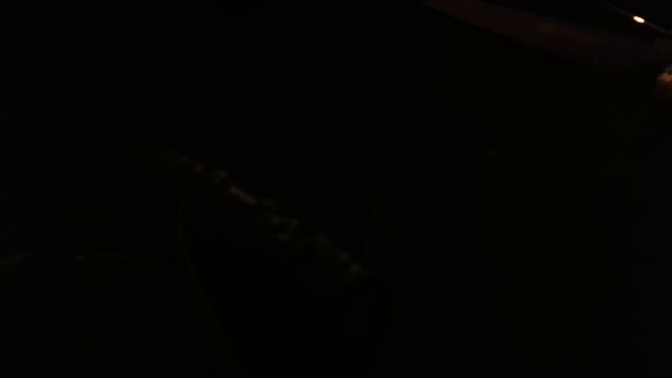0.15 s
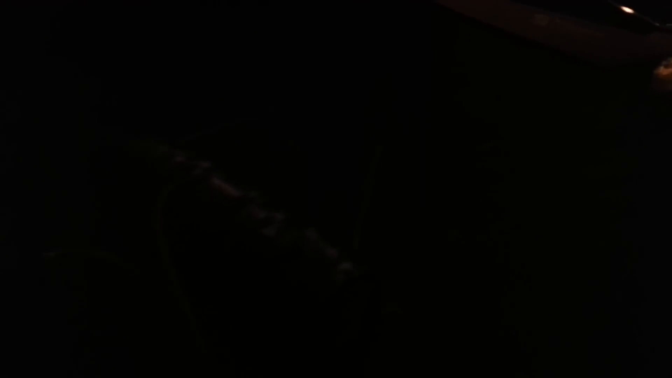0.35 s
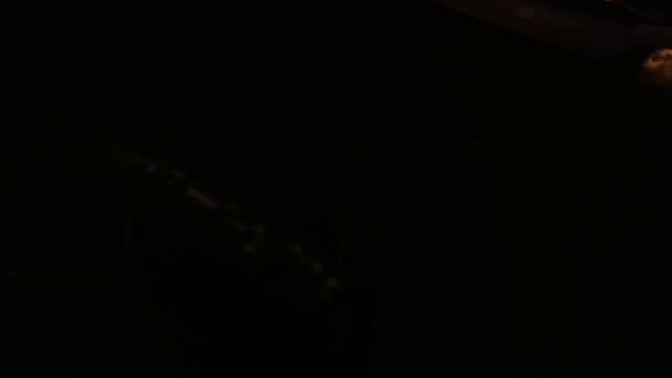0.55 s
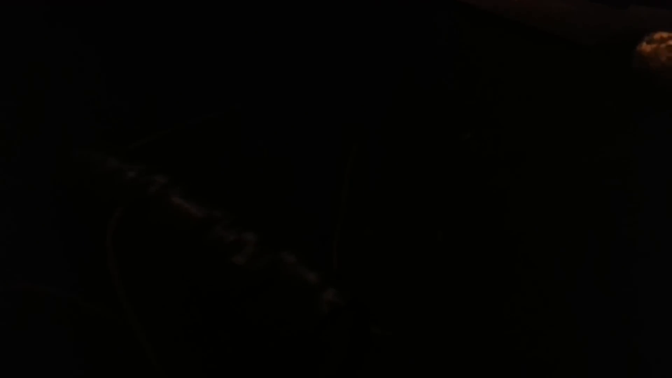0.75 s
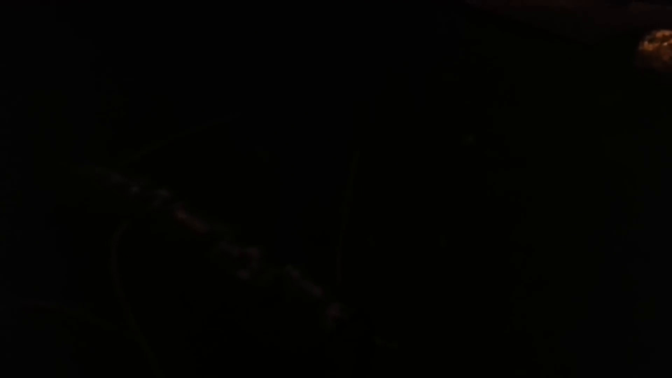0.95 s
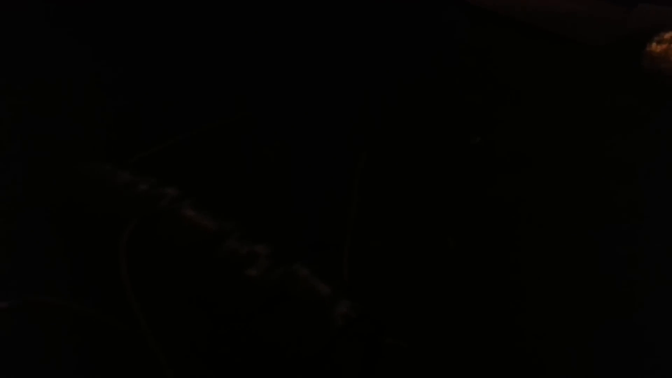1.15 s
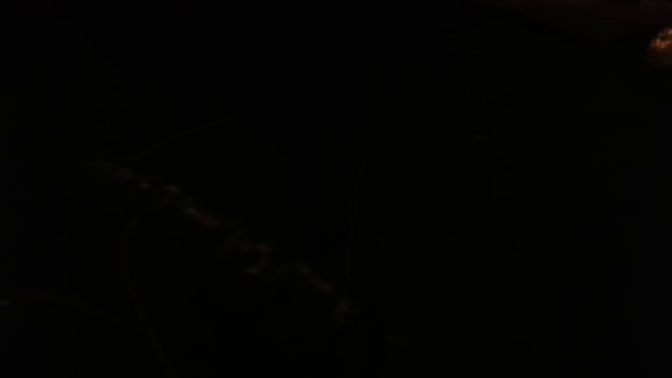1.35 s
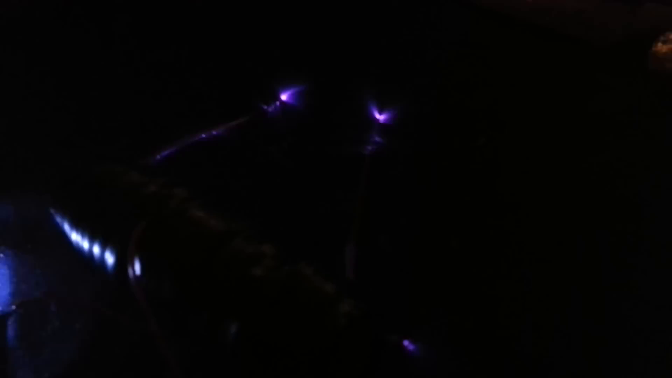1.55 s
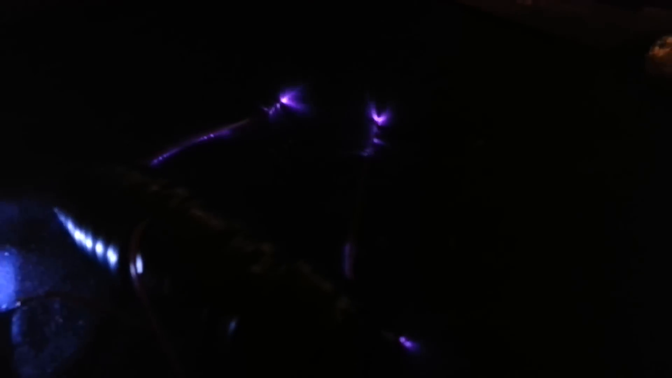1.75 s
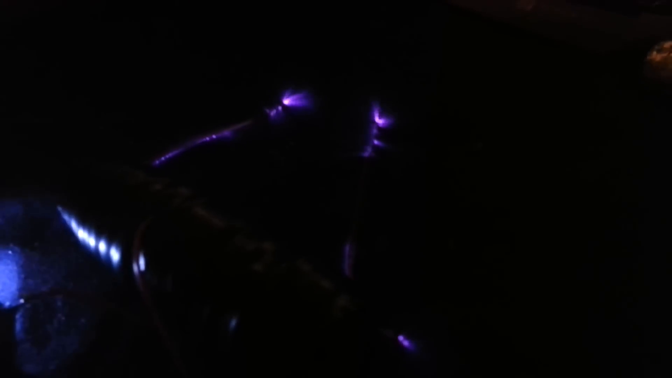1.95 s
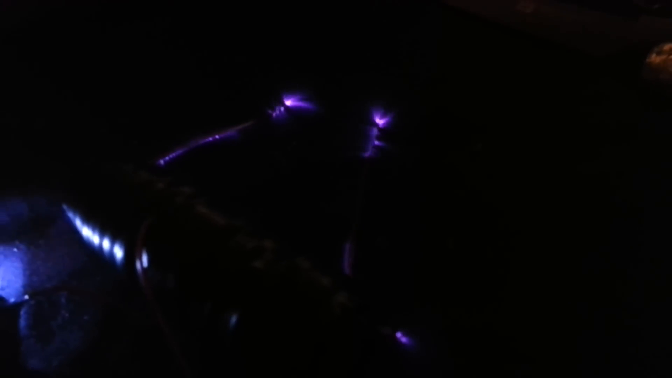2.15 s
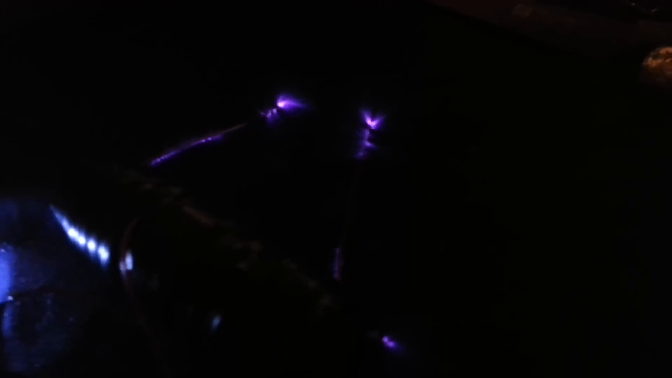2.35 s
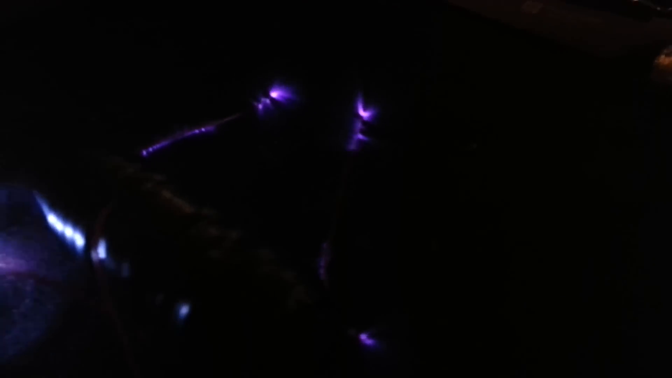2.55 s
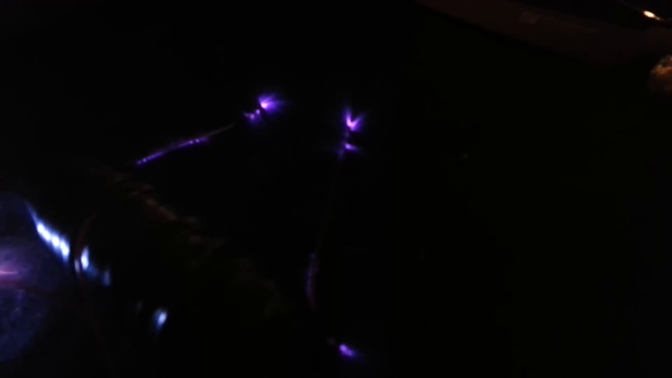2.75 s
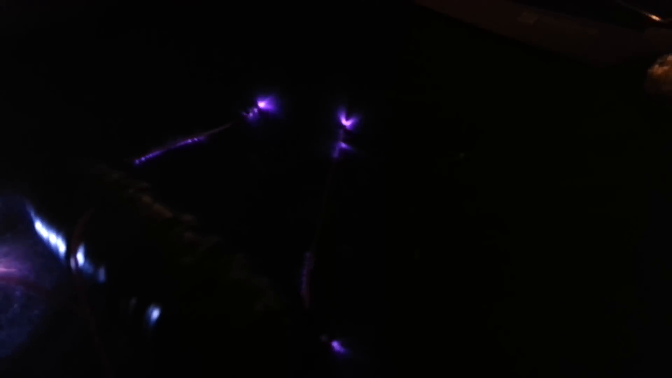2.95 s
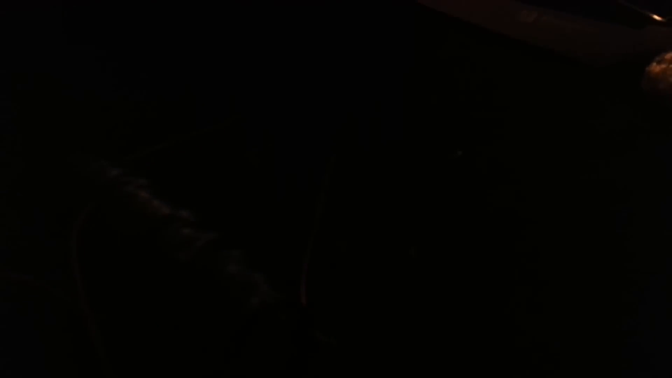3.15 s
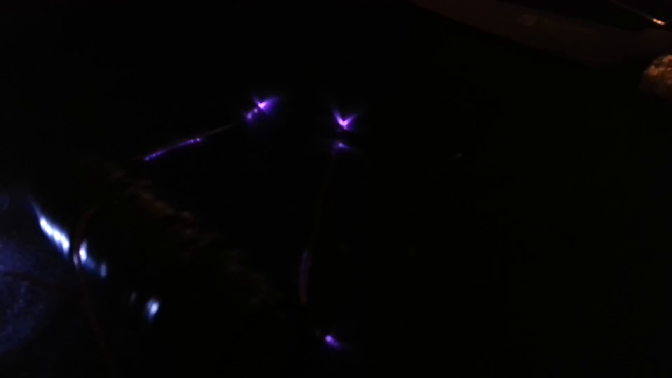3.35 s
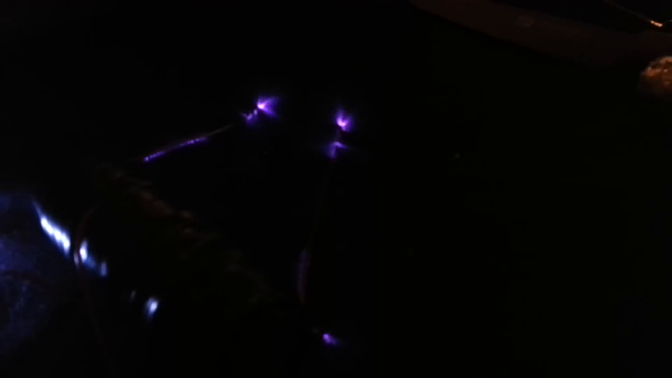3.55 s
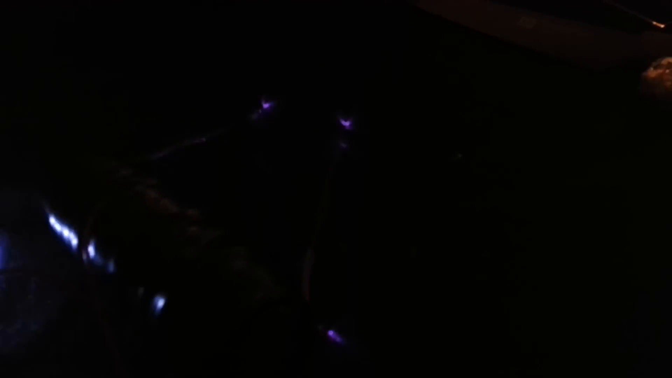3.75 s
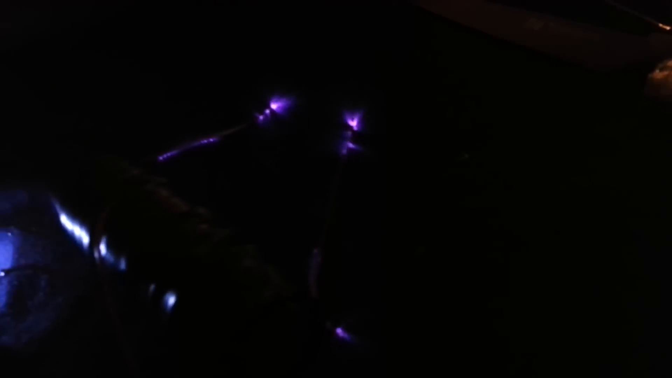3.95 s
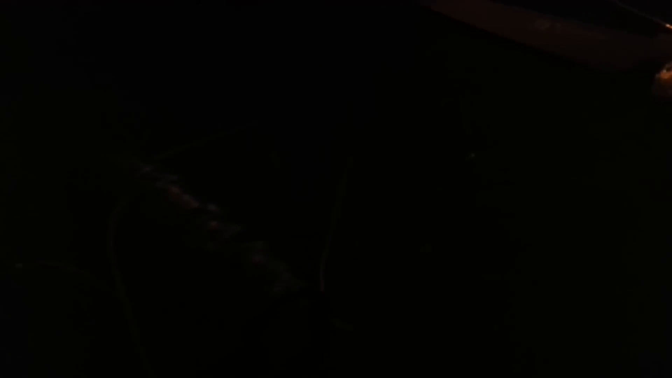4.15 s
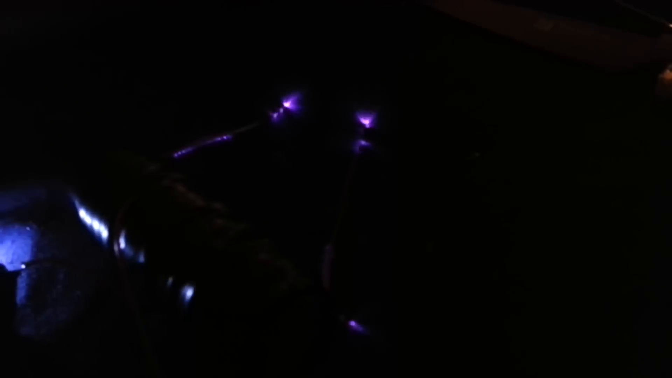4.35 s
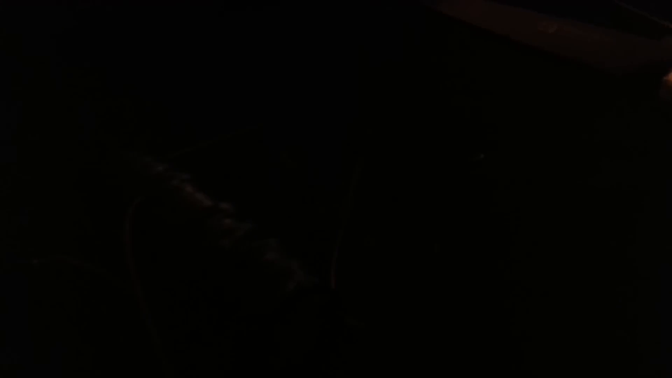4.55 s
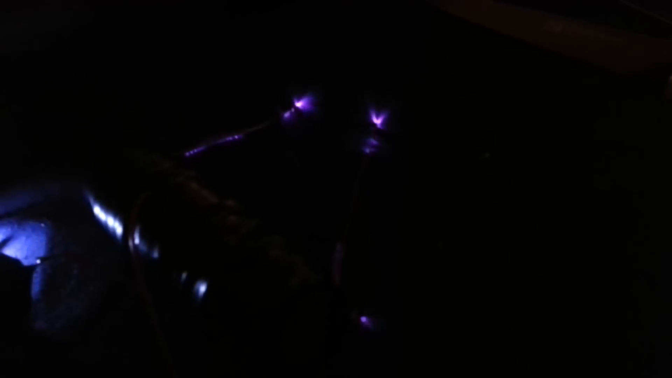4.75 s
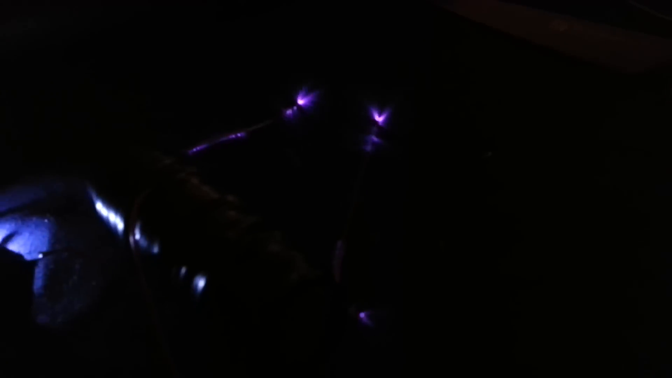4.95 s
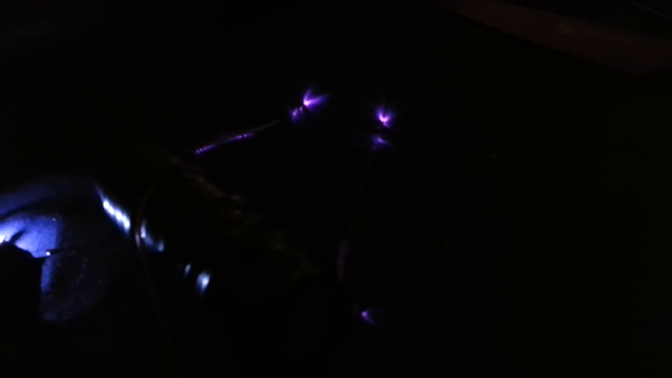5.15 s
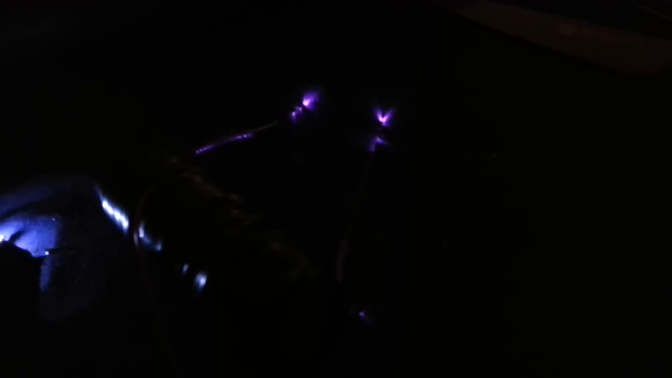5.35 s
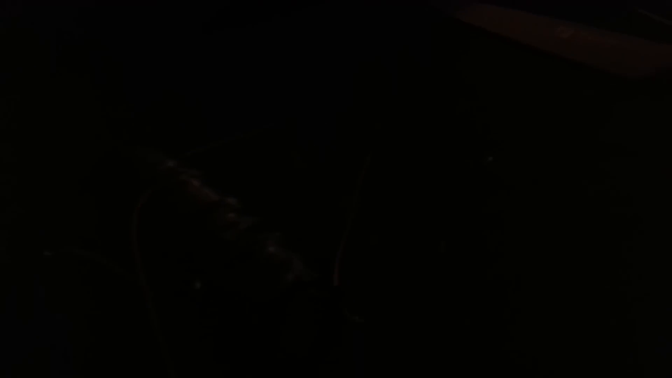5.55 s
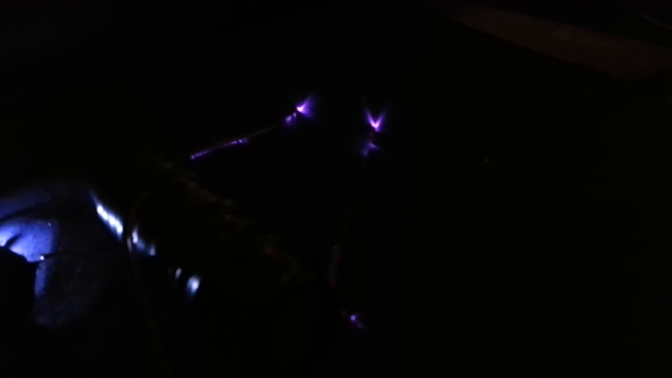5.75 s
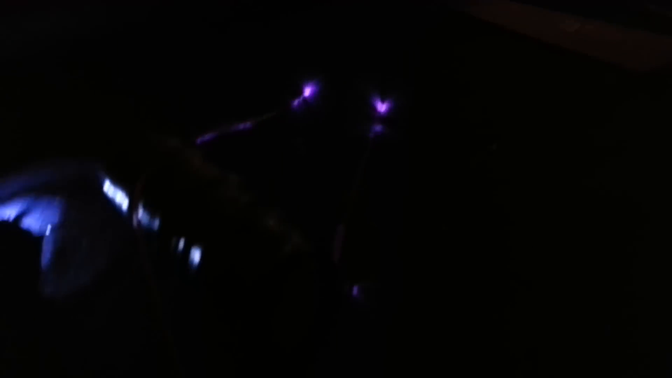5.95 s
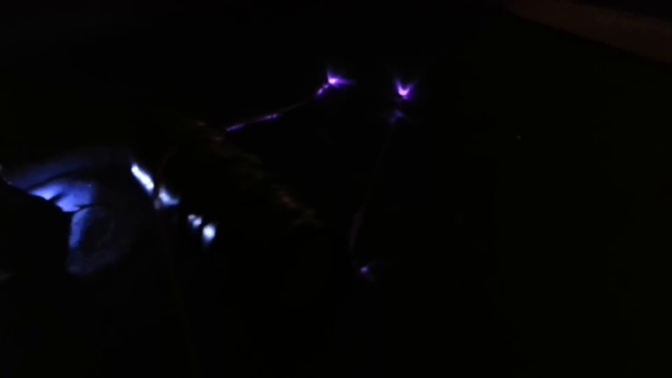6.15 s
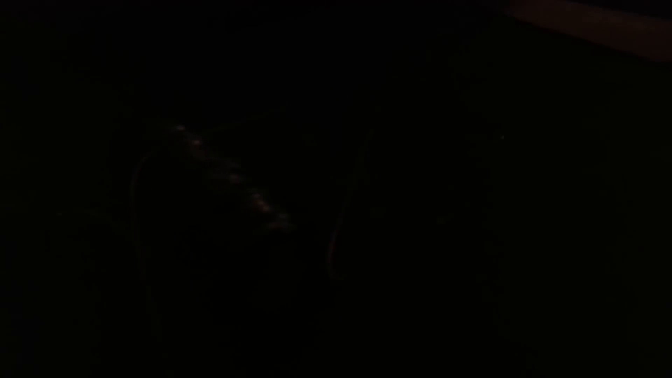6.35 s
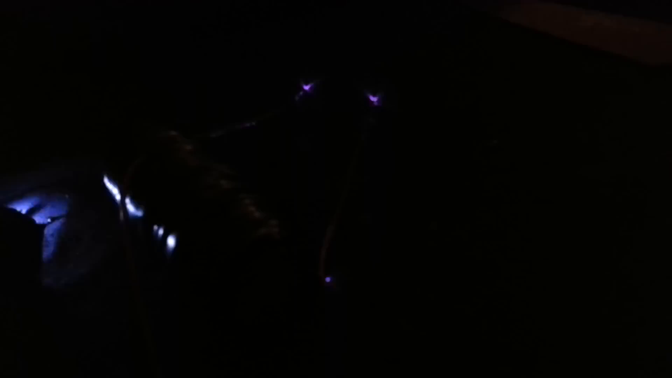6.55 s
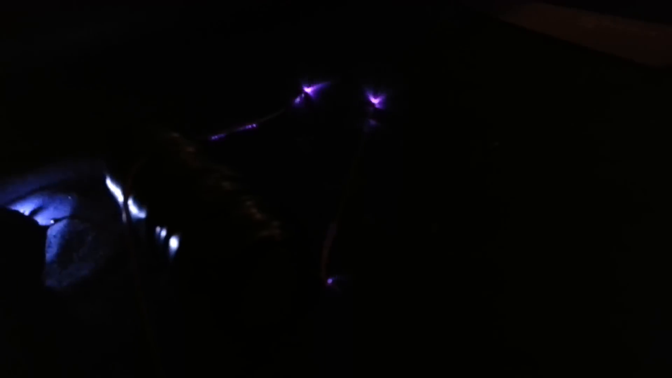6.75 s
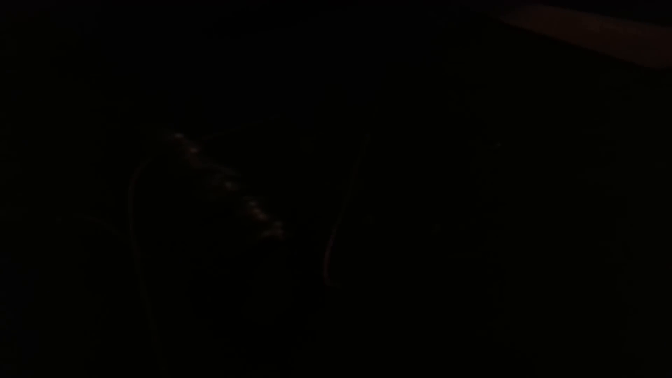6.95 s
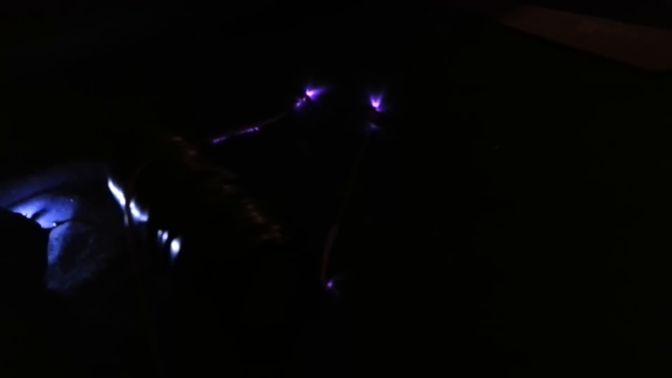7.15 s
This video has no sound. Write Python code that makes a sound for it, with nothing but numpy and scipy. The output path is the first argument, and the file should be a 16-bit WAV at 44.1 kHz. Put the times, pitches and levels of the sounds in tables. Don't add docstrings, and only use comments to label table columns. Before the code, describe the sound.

In a quiet room with low rumble, fingertips tap dully on a phone case and a small part clicks. Then a small high-voltage coil snaps on close by, crackling densely before settling into bright corona hiss with a thin high whine. It cuts dead and restarts several times, each start a sharp snap, the room ringing briefly in the pauses. Close stereo phone microphones.

```python
import sys
import numpy as np
from scipy import signal
from scipy.fft import rfft, irfft
from scipy.io import wavfile
from scipy.ndimage import uniform_filter1d, minimum_filter1d

SR = 44100
rng = np.random.default_rng(int(sys.argv[2]) if len(sys.argv) > 2 else 0)


def natural_amplitude(level_db):
    exponent = np.asarray(level_db, float) / 20
    return 10 ** exponent


def master(y):
    cut = np.clip(np.atleast_2d(y).T, -1, 1)
    pcm = np.round(cut * 32767)
    wavfile.write(sys.argv[1], SR, pcm.astype(np.int16))


N = 317079
TIME = np.arange(N) / SR
LAG_MS = 0.3176


def unit(x):
    return x / np.sqrt(np.mean(x ** 2))


def colour(x, hz, db):
    log_hz = np.log(np.maximum(np.fft.rfftfreq(4096, 1 / SR), 1))
    cepstrum = irfft(np.interp(log_hz, np.log(hz), db) * np.log(10) / 20)
    cepstrum[1:2048] *= 2
    cepstrum[2049:] = 0
    return signal.fftconvolve(x, irfft(np.exp(rfft(cepstrum))))[:len(x)]


def band(x, hz, width_hz):
    return signal.lfilter(*signal.iirpeak(hz, hz / width_hz, SR), x)


def walk(rate_hz):
    hold = int(SR / rate_hz)
    steps = np.repeat(rng.standard_normal(N)[:N // hold + 1], hold)
    return 1.3 * uniform_filter1d(uniform_filter1d(steps, hold), hold)[:N]


def panned(db, pan_db):
    return natural_amplitude(db + np.array([[pan_db / 2], [-pan_db / 2]]))


def floor():
    # frequency in Hz, density in dB per Hz.
    noise_curve = [(15, -39), (45, -20), (60, -6), (180, -5), (260, -4.5), (500, -11), (1000, -14.5),
                   (2000, -18.5), (4000, -21.5), (6000, -24.5), (10000, -24.5), (13500, -21), (15000, -23)]
    # frequency in Hz, rms level in dB.
    hum_lines = [(59.2, -67), (120, -72), (178, -72), (255, -69.5)]
    noise = rng.standard_normal((3, N))
    alike = 0.9 * signal.lfilter(*signal.butter(1, 250, fs=SR), noise[2])
    hz, db = np.transpose(noise_curve)
    tilt_db = 2.9 * np.clip((hz - 8000) / 5000, 0, 1)
    left = colour(noise[0] + alike, hz, db + tilt_db)
    right = colour(noise[1] + alike, hz, db - tilt_db)
    hum = 0
    for line_hz, line_db in hum_lines:
        hum = hum + np.sqrt(2) * natural_amplitude(line_db + 2 * walk(5)) * np.sin(2 * np.pi * line_hz * TIME)
    return natural_amplitude(-55) * unit(np.array([left, right])) + hum


def finger_ticks():
    # start in seconds, peak in dB, ring in Hz.
    knocks = [(0.0084, -27, 1930), (0.1272, -36, 2480), (0.1431, -28.5, 2060), (0.8044, -38, 2300),
              (0.8146, -46, 2900), (0.8236, -39, 2120), (0.834, -42, 3000), (0.8472, -29.5, 2110),
              (0.849, -44, 2300), (0.8558, -37, 2210), (0.9085, -47, 2200), (0.9131, -21, 2030),
              (0.9445, -46, 3000), (0.9496, -43, 2900), (0.9648, -40, 900), (1.0595, -43, 2610)]
    out = np.zeros((2, N))
    t = TIME[:2000]
    for start_s, peak_db, ring_hz in knocks:
        tick = np.sin(2 * np.pi * ring_hz * t) * (t / 0.0003) ** 2 * np.exp(2 - t / 0.0001)
        i = int(start_s * SR)
        out[:, i:i + len(t)] += panned(peak_db, 20) * tick
    return out


def part_clicks():
    # start in seconds, peak in dB, left minus right in dB.
    parts = [
        (0.036, -47, 16),
        (1.316, -48, 12),
    ]
    out = np.zeros((2, N))
    t = TIME[:2000]
    for start_s, peak_db, pan_db in parts:
        click = rng.standard_normal(len(t)) * np.exp(-t / 0.00031)
        click += natural_amplitude(8.0) * np.sin(2 * np.pi * 14200 * t) * np.exp(-t / 0.0007)
        ring = np.sin(2 * np.pi * 14010 * t) + natural_amplitude(-4) * np.sin(2 * np.pi * 12000 * t)
        click += natural_amplitude(-16) * ring * (t > 0.02) * (t < 0.042)
        i = int(start_s * SR)
        out[:, i:i + len(t)] += panned(peak_db, pan_db) * click
    return out


def current():
    # on in seconds, off in seconds.
    switching = [
        (1.7692, 3.262),
        (3.579, 3.822),
        (3.9994, 4.283),
        (4.4567, 4.746),
        (4.9256, 5.614),
        (5.8212, 6.524),
        (6.7947, 7.03),
    ]
    # hiss in dB, inrush in dB, creep in dB per second.
    spell_levels = [
        (-16, 4, 1),
        (-19, 7.5, 10.5),
        (-18.5, 18, 3.5),
        (-17, 12, 1.5),
        (-17, 5.5, 1),
        (-17, 0, -1.5),
        (-19, 3, -1),
    ]
    # time in seconds, coldness 0-1.
    warm_up = [(1.77, 0.5), (1.81, 0.94), (1.9, 0.91), (2.3, 1), (2.5, 0.9), (2.6, 0.73), (2.8, 0.53),
               (3.15, 0.41), (3.26, 0.17), (3.4, 0.1)]
    # centre in seconds, length in seconds, change in dB.
    wavers = [
        (1.774, 0.0047, -17),
        (1.786, 0.024, 4.5),
        (1.804, 0.009, -5),
        (1.89, 0.011, -1),
        (1.991, 0.0059, -8.5),
        (6.398, 0.2, 0.5),
        (6.527, 0.047, 2.5),
        (7.008, 0.011, 2),
    ]
    inrush_s, lock_s, strike_s, quench_s = 0.028, 0.049, 0.0025, 0.002
    first_lock_s = 2.61
    spells = np.hstack([switching, spell_levels])
    spell = np.maximum(np.searchsorted(spells[:, 0], TIME) - 1, 0)
    start, end, level_db, inrush_db, creep_db_per_s = spells[spell].T
    age, left = np.maximum(TIME - start, 0), np.maximum(end - TIME, 0)
    on = np.clip(age / 0.00011, 0, 1) * np.clip(left / 0.00029, 0, 1)
    cold = np.interp(TIME, *np.transpose(warm_up))

    hiss_db = level_db + inrush_db * np.exp(-age / inrush_s) + creep_db_per_s * age - 7.5 * cold
    for centre_s, length_s, db in wavers:
        hiss_db = hiss_db + db * np.exp(-(2 * (TIME - centre_s) / length_s) ** 4)
    flare_db = 19.5 * np.exp(-age / strike_s) + 15.5 * np.exp(-left / quench_s)
    crackle_db = -23 + 28.5 * cold + flare_db
    unlocked = np.clip((first_lock_s - TIME) / 0.14, 0, 1)
    whine_db = -7 - 23.5 * np.exp(-age / lock_s) - 26.5 * unlocked
    pan_db = -0.27 * (TIME - 3.5) - 2.93 * cold
    return on, cold, hiss_db, crackle_db, whine_db, pan_db


def pulses(times_s, sizes):
    at = np.clip(times_s * SR * 4, 0, N * 4 - 1).astype(int)
    return signal.resample_poly(np.bincount(at, sizes, N * 4), 1, 4) * 4


def snaps():
    # start in seconds, peak in dB, bass re peak in dB.
    strong_sparks = [(1.7698, -2.5, -17.5), (1.785, 5.5, -28), (1.8157, -1.5, -60), (3.1911, -1, -73),
                     (3.5788, 1, -20), (3.8118, -0.5, -63), (3.8186, -30.5, -17), (3.9986, 5, -35),
                     (4.2652, -10.5, -16), (4.4575, 7, -18.5), (4.7413, -8, -18.5), (4.926, -4, -14),
                     (5.3255, -6.5, -50), (5.348, -11, -53), (5.4153, -7.5, -53), (5.6093, -2.5, -24),
                     (5.821, 7.5, -27.5), (6.5189, -5.5, -27), (6.7947, 8.5, -39)]
    start_s, peak_db, bass_db = np.transpose(strong_sparks)
    out = []
    for side, lag_s in ((1, LAG_MS / 1000), (-1, 0)):
        at_s = start_s + lag_s
        spark = pulses(at_s, natural_amplitude(peak_db - side * 5))
        crack = band(spark, 4570, 1670) + natural_amplitude(-5.5) * band(spark, 10040, 7500)
        thump = band(pulses(at_s, natural_amplitude(peak_db + bass_db + side * 1.75)), 800, 940)
        out.append(natural_amplitude(14.0) * crack + natural_amplitude(22.5) * thump)
    return np.array(out)


def grains(rate_hz, spread_db):
    when, size = rng.random((2, 160000))
    count = int(rate_hz * N / SR)
    sparks = pulses(when[:count] * N / SR, natural_amplitude(-spread_db * np.log(size[:count] + 1e-9)))
    return unit(sparks - sparks.mean())


def ports(source, left_db, right_db, hz):
    # frequency in Hz, advance in radians.
    phase_bend = [(3000, .6), (5800, 1.5), (6200, 3.2), (6350, .6), (6800, 1.5), (9200, 1.2), (10200, .4),
                  (14000, .4)]
    shared = 0.97
    own = np.sqrt(1 - shared ** 2)
    common = source()
    turn = np.interp(np.fft.rfftfreq(N, 1 / SR), *np.transpose(phase_bend))
    late = np.roll(irfft(rfft(common) * np.exp(1j * turn), N), int(LAG_MS * SR / 1000))
    left = colour(shared * late + own * source(), hz, left_db)
    right = colour(shared * common + own * source(), hz, right_db)
    return unit(np.array([left, right]))


def crackle(cold):
    # frequency in Hz, left in dB, right in dB.
    streamer = [(1500, -60, -62), (1800, -27, -30), (2700, -18, -11), (3500, -5, 0), (4100, -9, -4),
                (4800, -19, -5), (5600, -19, -9), (6600, -13, -10), (7500, -21, -8), (10000, -17, -6),
                (11500, -9, -10), (12800, -8, -20), (14000, 1, -10)]
    hz, left_db, right_db = np.transpose(streamer)
    burst_db = (6 - 4.5 * cold) * np.clip(walk(110), -2, 1.4)
    return natural_amplitude(burst_db) * ports(lambda: grains(3500, 2.2), left_db, right_db, hz)


def hiss():
    # frequency in Hz, gain in dB.
    left_path = [(700, -42), (1300, -30), (1900, -26), (3500, -20), (4500, -19), (4800, -27), (5400, -28),
                 (5600, -44), (5850, -15), (7800, -19), (9500, -22), (10500, -11), (11500, -3), (13300, 0),
                 (14500, -3)]
    # frequency in Hz, gain in dB.
    right_path = [(700, -56), (2400, -40), (3200, -14), (4800, -11), (5500, -11), (5780, -18), (6000, -14),
                  (6700, -15), (7300, -8), (9500, -4), (11000, -1), (12900, -1), (13500, -8), (14500, -9)]
    hz, left_db = np.transpose(left_path)
    right_db = np.interp(hz, *np.transpose(right_path))
    return natural_amplitude(0.97 * walk(150)) * ports(lambda: grains(20000, 0.62), left_db, right_db, hz)


def whine():
    rate_hz, jitter, port_lag_ms = 11480, 0.105, 0.37
    gaps_s = (1 + jitter * rng.standard_normal(100000)) / rate_hz
    times_s = np.cumsum(gaps_s * (1 + 0.004 * walk(300)[:len(gaps_s)]))
    train = unit(band(pulses(times_s, 1.0 * (times_s < N / SR)), rate_hz, 600))
    return np.array([natural_amplitude(-9.5) * np.roll(train, int(port_lag_ms * SR / 1000)), train])


def coil():
    on, cold, hiss_db, crackle_db, whine_db, pan_db = current()
    mix = hiss() + natural_amplitude(crackle_db + 3.0) * crackle(cold)
    mix += natural_amplitude(whine_db + 0.83 * walk(200)) * whine()
    port_db = hiss_db + 5.0 + np.array([pan_db, -pan_db]) / 2
    return on * natural_amplitude(port_db) * mix + snaps()


def space(x):
    # delay in ms, share left, share right.
    echoes = [
        (1.915, -.42, .08),
        (1.35, .05, .15),
        (2.7, .12, .03),
        (13.5, .07, .06),
    ]
    # frequency in Hz, left in dB, right in dB, T60 in seconds.
    room_tail = [(1420, 6, -1.5, 0.31), (3490, -3, -9, 0.47), (7700, -3, -14, 0.38),
                 (11300, -4.5, -17.5, 0.38), (13500, -5, -11.5, 0.31)]
    out = x.copy()
    for delay_ms, *shares in echoes:
        out += np.array(shares)[:, None] * np.roll(x, int(delay_ms * SR / 1000), axis=1)
    hz, left_db, right_db, t60_s = np.transpose(room_tail)
    f, frames_s, z = signal.stft(rng.standard_normal((2, SR)), SR, nperseg=256)
    z = z * natural_amplitude(-60 * frames_s / np.interp(f, hz, t60_s)[:, None])
    onset = np.clip(TIME[:SR] / 0.0059, 0, 1)
    tail = signal.istft(z, SR)[1][:, :SR] * onset / np.sqrt(SR / 20)
    tail = np.array([colour(tail[0], hz, left_db), colour(tail[1], hz, right_db)])
    return out + signal.fftconvolve(x, tail, axes=1)[:, :N]


def scene():
    return floor() + finger_ticks() + part_clicks() + space(coil())


def pair(z, margin_db):
    spare_db, gap_db = 8, 4
    both = np.array([z[0] + z[1], z[0] - z[1]]) / 2
    power_db = 10 * np.log10((np.abs(both) ** 2).reshape(2, 64, 16, -1).sum(2) + 1e-18)
    poor = margin_db.reshape(2, 64, 2, -1).mean(2).max(0) < spare_db
    weaker = power_db < power_db[::-1] - gap_db
    both = both * np.repeat(~(poor & weaker), 16, axis=1)
    return np.array([both[0] + both[1], both[0] - both[1]])


def starve(x):
    # frequency in Hz, level re whole sound in dB.
    least_kept = [(30, -27), (130, -33), (300, -39), (1000, -39), (1300, -45), (1550, -39), (1800, -45),
                  (2400, -44), (4000, -41), (6000, -38), (9000, -39), (11000, -43), (14000, -47)]
    recover_s, scatter_db, line_db = 0.0207, 2.73, -6
    f, frames_s, z = signal.stft(x, SR, window="cosine", nperseg=2048, noverlap=1024)
    power = np.abs(z[:, :1024]) ** 2
    bands = power.reshape(2, 128, 8, -1).mean(2)

    hold = np.exp(-frames_s[1] / recover_s)
    total_db = 10 * np.log10(power.sum(1) + 1e-12)
    recent_db = signal.lfilter([1 - hold], [1, -hold], total_db + 60) - 60
    loud_db = np.minimum(total_db, recent_db)
    loud_db -= 0.46 * np.clip(-22.5 - loud_db, 0, 40)

    limit_db = loud_db[:, None] + np.interp(f[4:1024:8], *np.transpose(least_kept))[:, None]
    margin_db = 10 * np.log10(bands + 1e-18) - limit_db
    margin_db += scatter_db * rng.standard_normal(bands.shape)
    strong = power > natural_amplitude(2 * np.repeat(limit_db, 8, axis=1) + 2 * line_db)
    gain = strong * np.repeat(np.clip(margin_db + 0.5, 0, 1), 8, axis=1)
    z[:, :1024] = pair(z[:, :1024] * np.maximum(gain, 0.005), margin_db)
    return signal.istft(z, SR, window="cosine", nperseg=2048, noverlap=1024)[1][:, :N]


def hush(x):
    ahead_s, depth_db = 0.009, -20
    level_db = 20 * np.log10(uniform_filter1d(np.abs(x).sum(0), size=64) + 1e-9)
    jump_db = np.roll(level_db, -int(ahead_s * SR)) - level_db
    return x * natural_amplitude(uniform_filter1d(depth_db * np.clip((jump_db - 20) / 6, 0, 1), size=32))


def top_cut(x):
    return signal.sosfilt(signal.butter(12, 15810, fs=SR, output="sos"), x)


def record(dry):
    top_hz, ceiling = 14500, 0.98
    low_pass = signal.ellip(12, 0.2, 60, top_hz, fs=SR, output="sos")
    x = signal.sosfilt(low_pass, 1.6 * np.tanh(dry / 1.6))
    x = hush(starve(x))
    duck = minimum_filter1d(ceiling / np.maximum(np.abs(x), ceiling), 401)
    duck = uniform_filter1d(uniform_filter1d(duck, size=200), size=200)
    return top_cut(x * duck)


dry = scene()
out = record(dry)
master(out)
```